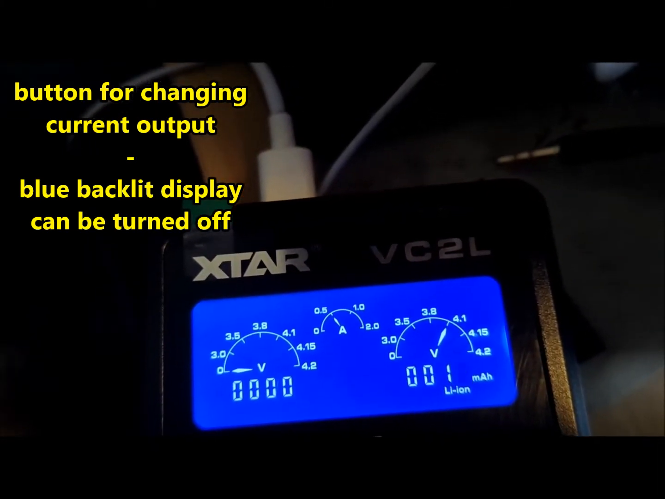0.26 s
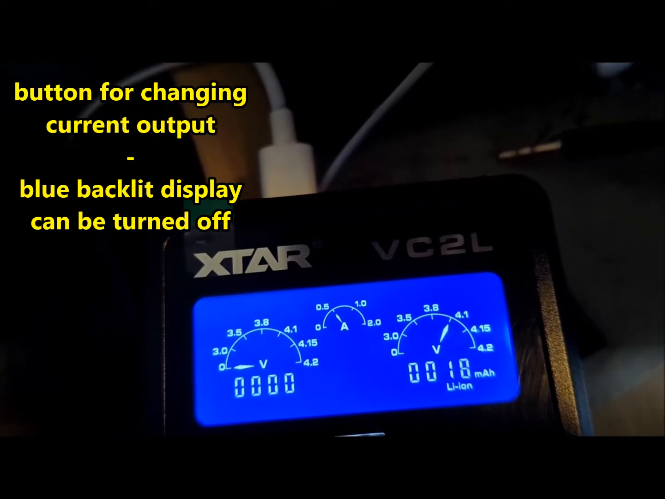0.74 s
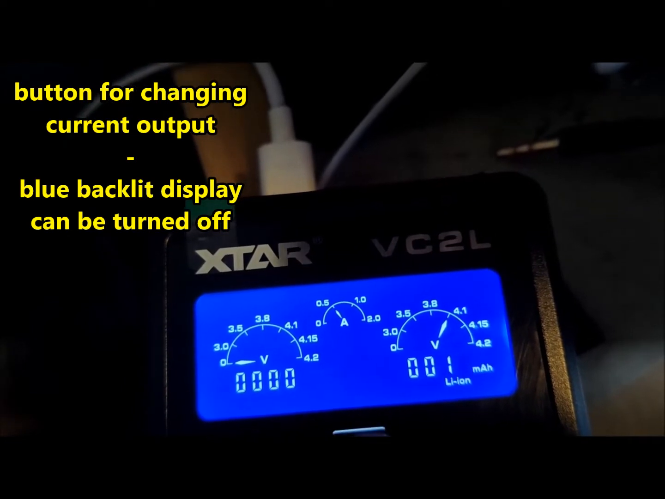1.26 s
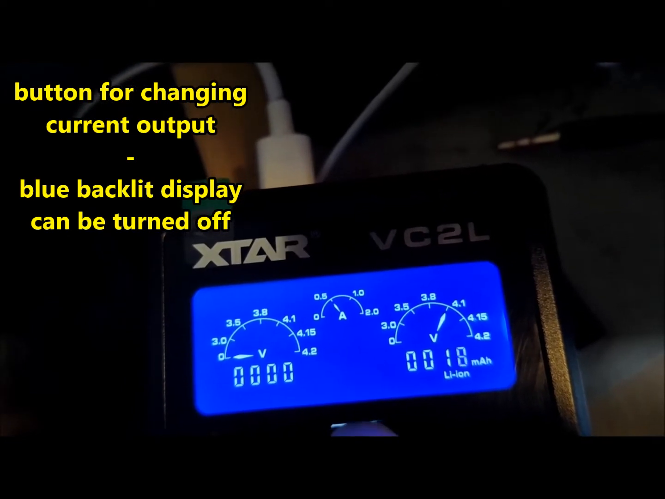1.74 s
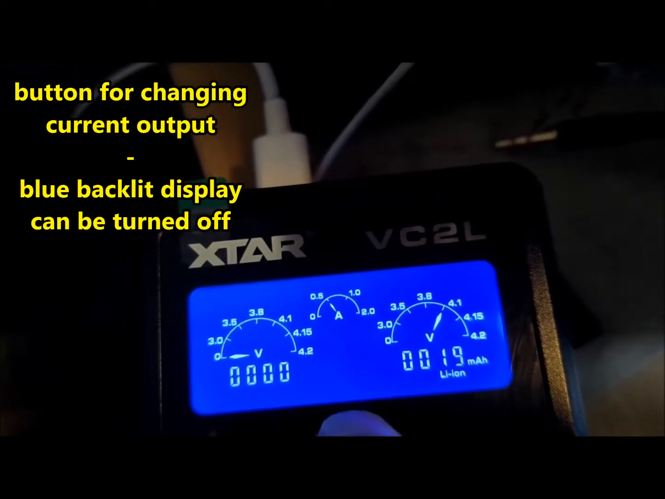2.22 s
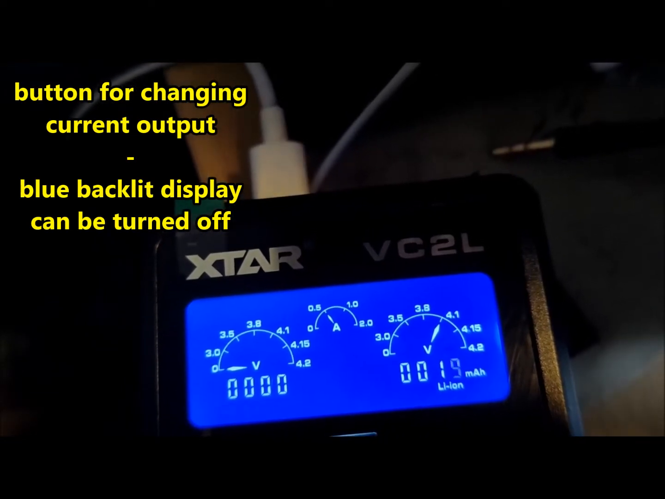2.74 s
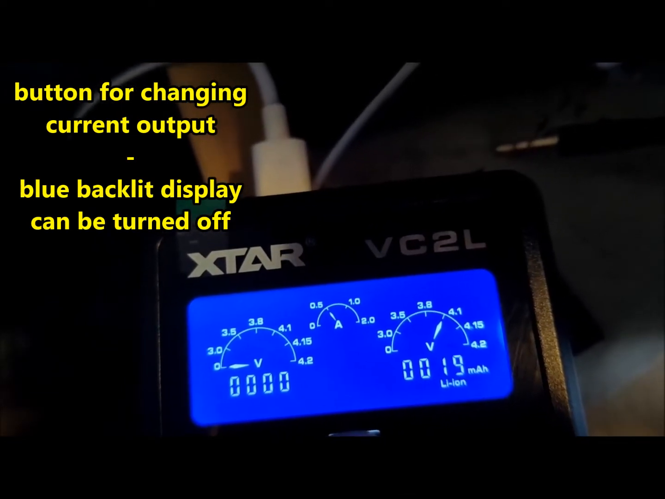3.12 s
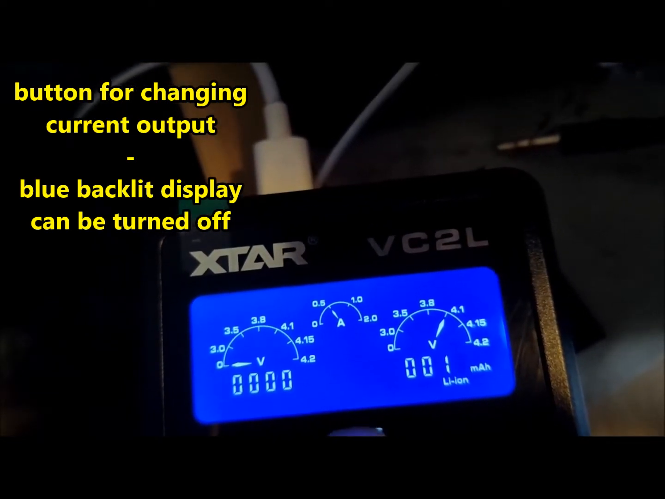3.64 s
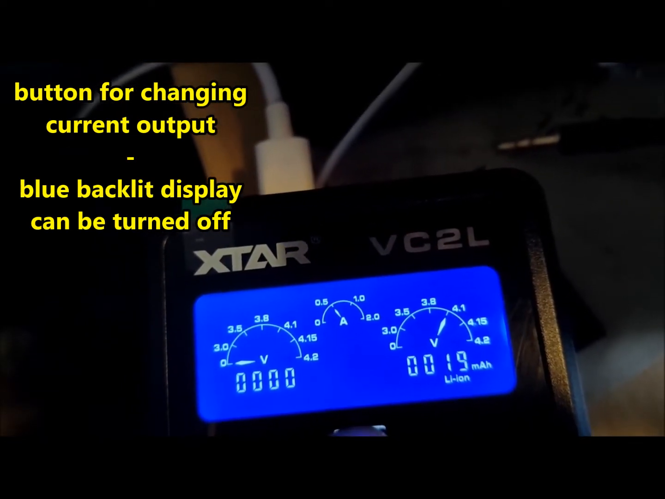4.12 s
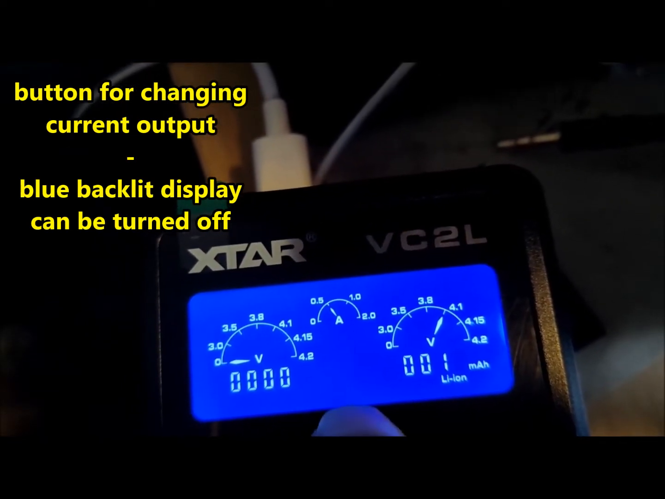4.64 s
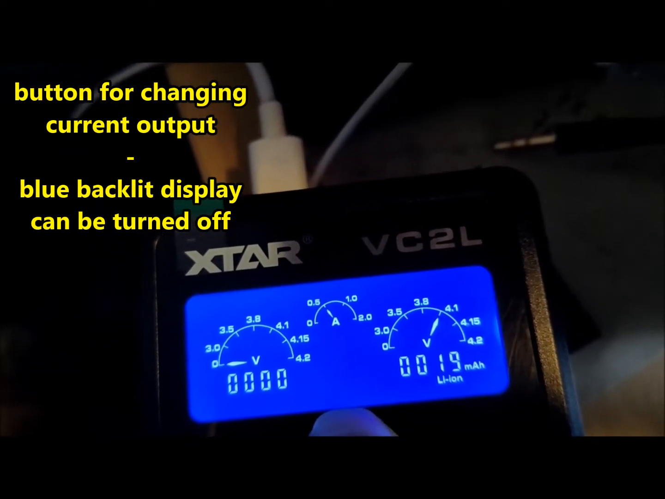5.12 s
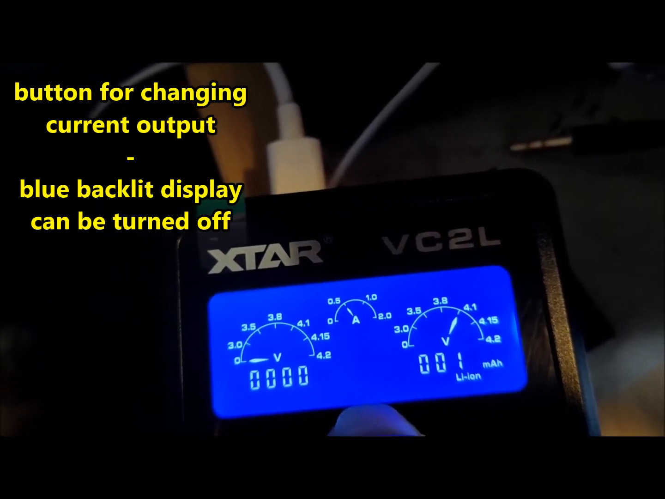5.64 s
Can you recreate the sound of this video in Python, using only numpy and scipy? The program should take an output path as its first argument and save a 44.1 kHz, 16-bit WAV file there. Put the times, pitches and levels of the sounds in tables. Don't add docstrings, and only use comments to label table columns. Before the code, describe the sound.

Close to a hand-held microphone in a quiet indoor room, a small plastic button is clicked several times. Early clicks are moderate; later presses snap much brighter, each followed by a softer, duller release and small thump. Between them the hand shifts with low bumps and gritty ticks, densest in the middle. Faint hum, rumble and hiss lie underneath, and the tone is narrow, lacking the highest treble.

```python
import sys
import numpy as np
from scipy import signal
from scipy.io import wavfile

SR = 44100
rng = np.random.default_rng(int(sys.argv[2]) if len(sys.argv) > 2 else 0)


def gain_from_db(level_db):
    decades = np.asarray(level_db, float) / 20
    return 10 ** decades


def master(y):
    cut = np.clip(np.atleast_2d(y).T, -1, 1)
    pcm = np.round(cut * 32767)
    wavfile.write(sys.argv[1], SR, pcm.astype(np.int16))


N = 258896
LEAD_S = 0.01

# t/s, dome level/dB, lid level/dB, case level/dB, thump level/dB
SNAPS = [(0.2374, -25.5, -26.5, -29.5, -36), (0.253, -32.5, -44, -58, -76), (0.2668, -48, -50, -55, -65),
         (1.4609, -35.5, -37.5, -36, -42.5), (1.8006, -45, -25, -38, -35.5),
         (1.803, -24.5, -52.5, -29, -66), (2.914, -13.5, -17, -30, -37), (3.1973, -24.5, -26, -29, -35.5),
         (3.8023, -37, -50.5, -58, -78), (3.812, -63, -63, -57, -56), (4.1188, -3, -16.5, -33, -39.5),
         (4.4176, -21.5, -20, -25.5, -36.5), (4.9168, -3.5, -17.5, -32, -41),
         (5.2691, -19.5, -18, -26, -35)]
EARLY_SNAP = [
    (-0.0028, -38.5, -43.5, -41.5, -43),
]
# t/s, tilt/(dB/octave)
FINGER_TILT = [(0.24, -20), (1.46, -13), (1.8, -18.5), (2.91, 9.5), (3.2, -5.5), (4.12, 7.5), (4.42, 2),
               (4.92, 17), (5.27, 1)]
# f/Hz, level/dB, T60/s
DOME_MODES = [(5530, -15.5, .016), (5918, -9, 0.016), (6400, -16.5, 0.022), (6310, -4.5, 0.029),
              (6615, -3, 0.025), (6804, 1.7, 0.015), (7030, -10, 0.035), (7500, -20.5, 0.021),
              (7780, -25, 0.025)]
# f/Hz, level/dB, T60/s
LID_MODES = [(2790, -4, 0.01), (3103, -8, 0.015), (3500, -3, 0.017), (4294, -8, 0.023),
             (4800, -11.5, 0.018)]
# f/Hz, level/dB, T60/s
CASE_MODES = [(720, -17, 0.048), (1090, -11.5, 0.034), (1370, -8, 0.038), (1666, 5, 0.03),
              (1910, 2.5, 0.015), (2156, -0.5, 0.024)]
# f/Hz, level/dB, T60/s
THUMP_MODES = [(131, -7.5, 0.13), (200, -11.5, 0.063), (306.9, 3.5, 0.058), (583.2, -18.5, 0.09),
               (614, -20.5, 0.0303)]
# t/s, bump level/dB, bump f/Hz, tick level/dB
CREAKS = [(0.26, -43, 207, -41), (1.05, -53, 271, -63), (1.238, -53.5, 200, -71), (1.444, -48, 201, -76),
          (1.595, -50, 210, -73), (2.026, -49.5, 199, -54), (2.138, -53, 219, -59),
          (2.477, -44.5, 210, -52), (2.508, -52, 197, -48), (2.651, -46, 227.6, -53),
          (2.724, -51.5, 211, -51), (2.754, -50.5, 198, -57.5), (2.829, -51, 212, -60),
          (2.944, -52.5, 212, -41.5), (3.028, -46, 185, -54.5), (3.06, -51, 196, -51),
          (3.154, -46.5, 182, -56), (3.174, -57, 203, -50), (3.227, -48, 224, -49), (3.307, -49, 176, -49),
          (3.402, -45, 176, -45), (3.514, -47, 197, -51), (3.541, -48.5, 257, -50), (3.606, -52, 236, -51),
          (3.814, -62, 233, -46.5), (4.521, -52, 195, -59), (4.649, -50, 248, -53),
          (4.69, -56.5, 279, -55.5), (5.063, -49, 220, -54), (5.299, -55, 206.5, -53)]
# start t/s, step/s, slips, bump level/dB, bump f/Hz
JUDDERS = [
    (2.281, 0.025, 9, -50.5, 175),
    (4.074, .018, 3, -50.5, 225),
    (4.967, .031, 3, -49.5, 243),
]
# f/Hz, level/dB, T60/s
HAND_MODES = [(68.4, 0, 0.034), (130, -0.5, 0.056), (176, -1.6, 0.036), (242, -5.5, 0.084),
              (350, -0.5, 0.016), (654, -17.5, 0.032)]
# t/s, squeeze/(0-1)
SQUEEZE = [(0, 0.15), (1.4, 0.5), (1.95, 0.31), (2.3, 0.92), (2.7, .7), (3.5, 1.0), (3.85, 0.5),
           (4.4, 0.21), (5.87, 0.05)]
# t/s, level/dB
STRAIN = [(0.0, -77), (0.34, -75), (1.31, -76.5), (1.72, -74.5), (2.45, -71.5), (2.83, -72), (3.32, -69.5),
          (3.64, -71.5), (3.79, -71.5), (4.9, -71.5), (5.59, -73), (5.74, -76), (5.87, -77)]
# t/s, level/dB
MOTOR_LOAD = [(0.0, -74.5), (0.52, -77), (1.58, -73.5), (2.88, -75.5), (3.11, -72), (3.61, -70),
              (3.71, -76.5), (4.38, -85.5), (4.56, -77.5), (4.81, -82), (5.05, -85), (5.62, -75),
              (5.74, -79), (5.87, -94.5)]
# start t/s, stop t/s, f/Hz, level/dB
WHINES = [
    (4.97, 5.045, 238, -59.5),
    (3.66, 3.79, 2865, -83),
    (5.70, 5.86, 2433, -83),
]
# delay/ms, level/dB
ECHOES = [(2.0, -14), (3.4, -24.5), (5.2, -23), (9.6, -19.5), (12.8, -26.5), (42, -31.5)]
# f/Hz, level/(dB per Hz)
RUMBLE_SPECTRUM = [(15, -11.5), (45, -11.5), (110, -8), (200, -7), (360, -6), (500, -10.5), (640, -4.5),
                   (900, -35.5), (1500, -51.5)]
# f/Hz, level/(dB per Hz)
HISS_SPECTRUM = [(300, -20.5), (700, -7.5), (1100, 3.8), (1400, 2), (2100, 2.5), (3200, -4.5), (4700, -16),
                 (5700, -6), (6600, -0.5), (7300, -23), (7700, -18), (8400, -30)]


def rms_one(x):
    return x / np.sqrt(np.mean(x ** 2) + 1e-20)


def drift(rate_hz):
    hop = 40
    r = np.exp(-2 * np.pi * rate_hz * hop / SR)
    white = rng.standard_normal(N // hop + 2002)
    slow = signal.lfilter([1], [1, -2 * r, r * r], white)[2000:]
    return np.interp(np.arange(N) / hop, np.arange(len(slow)), rms_one(slow))


def band_pass(x, order, low_hz, high_hz):
    return signal.sosfilt(signal.butter(order, [low_hz, high_hz], "band", fs=SR, output="sos"), x)


def banded_noise(spectrum, patchy_db, per_octave):
    hz_points, db_points = np.transpose(spectrum)
    octaves = np.log2(hz_points[-1] / hz_points[0])
    edges_hz = hz_points[0] * 2 ** np.arange(0, octaves, 1 / per_octave)
    white = rng.standard_normal((2, N))
    out = 0
    for k, (low_hz, high_hz) in enumerate(zip(edges_hz, edges_hz[1:])):
        band = band_pass(white[k % 2], 2, low_hz, high_hz)
        level_db = np.interp(np.log(low_hz * high_hz) / 2, np.log(hz_points), db_points)
        flicker_db = patchy_db * (drift(12) + drift(1.5))
        out = out + band * gain_from_db(level_db + flicker_db)
    return rms_one(out)


def ring(force, hz, t60_s):
    r, w = gain_from_db(-60 / (t60_s * SR)), 2 * np.pi * hz / SR
    return signal.lfilter([0, np.sin(w)], [1, -2 * r * np.cos(w), r * r], force + 1e-18)


def struck(force, modes, peak_db, low_hz, high_hz, opposed=True):
    strengths = gain_from_db(rng.standard_normal(len(modes)))
    if opposed:
        strengths[::2] *= -1
    sound = 0
    for strength, (hz, db, t60_s) in zip(strengths, modes):
        sound = sound + strength * gain_from_db(db) * ring(force, hz, t60_s)
    sound = band_pass(sound, 3, low_hz, high_hz)
    return gain_from_db(peak_db) * sound / np.abs(sound).max()


def tilted(modes, tilt_db):
    middle = np.mean(np.log2([hz for hz, _, _ in modes]))
    return [(hz, db + tilt_db * (np.log2(hz) - middle), t60_s) for hz, db, t60_s in modes]


def add(track, s, sound):
    at = round((s + LEAD_S) * SR)
    track[at:at + len(sound)] += sound[:len(track) - at]


def hiss(strain_db):
    return gain_from_db(strain_db + 1.0) * banded_noise(HISS_SPECTRUM, patchy_db=1.47, per_octave=4)


def rumble(strain_db, squeeze):
    level_db = -73 + 0.17 * (strain_db - strain_db.mean()) + 3 * squeeze
    return gain_from_db(level_db) * banded_noise(RUMBLE_SPECTRUM, patchy_db=1.53, per_octave=3)


def hum(load_db, squeeze):
    motor_hz, whine_ramp_s = 118.1, 0.02
    t = np.arange(N) / SR
    phase = 2 * np.pi * motor_hz * t + 0.46 * drift(1.3)
    lower_db = -77 + 3.5 * np.tanh(drift(4.7))
    middle_db = -88.5 + 19.5 * squeeze + 4.6 * drift(6)
    out = gain_from_db(load_db + 2) * np.sin(2 * phase)
    out += gain_from_db(lower_db) * np.sin(phase)
    out += gain_from_db(middle_db) * np.sin(3 / 2 * phase)
    for start_s, stop_s, hz, db in WHINES:
        ramp = np.clip(np.minimum(t - start_s, stop_s - t) / whine_ramp_s, 0, 1)
        out += gain_from_db(db + 4) * np.sin(2 * np.pi * hz * t) * ramp
    return out


def room(x):
    tail_db, t60_s, onset_s = -49.5, 0.23, 0.0051
    t = np.arange(round(0.4 * SR)) / SR
    answer = gain_from_db(tail_db - 60 * t / t60_s) * rng.standard_normal(len(t)) * np.clip(t / onset_s, 0, 1)
    for ms, db in ECHOES:
        answer[round(ms * SR / 1000)] += gain_from_db(db)
    thin = signal.sosfilt(signal.butter(2, 4300, "high", fs=SR, output="sos"), x) + 0.17 * x
    return signal.fftconvolve(thin, answer)[:len(x)]


def judder_slips():
    rows = []
    for start_s, step_s, number, run_db, hz in JUDDERS:
        for k in range(round(number)):
            late, loud, high, gritty = rng.normal(0, 1, 4)
            bump_db = run_db + 2.5 * loud
            tick_db = bump_db - 3 + 2 * gritty
            rows.append((start_s + step_s * k + 0.0034 * late, bump_db, hz * (1 + 0.11 * high), tick_db))
    return rows


def faint_slips(squeeze):
    rate_per_s, squeeze_rate_db = 3.3, 17.5
    hop = SR // 100
    rows = []
    for k, (chance, late, loud, high, gritty) in enumerate(rng.random((N // hop, 5))):
        if chance < rate_per_s * gain_from_db(squeeze_rate_db * squeeze[k * hop]) * hop / SR:
            bump_db = -58.5 + 8 * (loud - 0.5)
            bump_hz = 200 * gain_from_db(1.9 * (high - 0.5))
            tick_db = bump_db - 0.5 + 14 * (gritty - 0.5)
            rows.append(((k + late) * hop / SR, bump_db, bump_hz, tick_db))
    return rows


def grip(squeeze):
    tick_t60_s = 0.04
    track = np.zeros(N + round(LEAD_S * SR))
    push = np.concatenate([np.hanning(80), np.zeros(3900)])
    t = np.arange(len(push)) / SR
    for s, bump_db, bump_hz, tick_db in list(CREAKS) + judder_slips() + faint_slips(squeeze):
        modes = [(hz, db - 9 * abs(np.log2(hz / bump_hz)), t60_s) for hz, db, t60_s in HAND_MODES]
        bump = struck(push, modes, bump_db - 6.5, low_hz=60, high_hz=891)
        tick = band_pass(rng.standard_normal(len(t)), 2, 450, 2800) * gain_from_db(-60 * t / tick_t60_s)
        add(track, s - 0.002, bump + gain_from_db(tick_db - 2) * tick)
    return track


def button():
    rebound, rebound_span_s = 0.18, 0.0045
    case_lag, thump_lag = 25, 80
    dome_tilt_share, case_tilt_share = 0.3, 0.3
    hash_db, hash_t60_s = -15.5, 0.07
    track = np.zeros(N + round(LEAD_S * SR))
    push = np.concatenate([np.hanning(60), np.zeros(6000)])
    t = np.arange(len(push)) / SR
    for s, dome_db, lid_db, case_db, thump_db in EARLY_SNAP + SNAPS:
        tilt_db = np.interp(s, *np.transpose(FINGER_TILT))
        flip = np.zeros(len(push))
        flip[[0, 20]] = 0.3, -1.0
        late, size = rng.random(8), rng.normal(0, 1, 8)
        contacts = flip.copy()
        np.add.at(contacts, 20 + (late * rebound_span_s * SR).astype(int), rebound * size * gain_from_db(-7 * late))
        dome_modes = tilted(DOME_MODES, dome_tilt_share * tilt_db)
        lid_modes = tilted(LID_MODES, tilt_db)
        case_modes = tilted(CASE_MODES, case_tilt_share * tilt_db)
        case_flip, late_push = np.roll(flip, case_lag), np.roll(push, thump_lag)
        sound = struck(contacts, dome_modes, dome_db, low_hz=4750, high_hz=9660, opposed=False)
        sound += struck(flip, lid_modes, lid_db - 5, low_hz=2450, high_hz=5010)
        sound += struck(case_flip, case_modes, case_db + 1.5, low_hz=693, high_hz=2500)
        sound += struck(late_push, THUMP_MODES, thump_db - 5, low_hz=99.4, high_hz=628.7)
        blur = band_pass(rng.standard_normal(len(t)) * gain_from_db(hash_db - 60 * t / hash_t60_s), 2, 560, 3900)
        add(track, s - 0.0004, sound + (gain_from_db(lid_db) + gain_from_db(case_db)) * blur)
    return track


def scene():
    t = np.arange(N) / SR
    strain_db, load_db, squeeze = [np.interp(t, *np.transpose(c)) for c in (STRAIN, MOTOR_LOAD, SQUEEZE)]
    snaps = button()
    events = (snaps + room(snaps) + grip(squeeze))[-N:]
    low = rumble(strain_db, squeeze) + hum(load_db, squeeze)
    low *= np.clip((t[-1] - t) / 0.16 + 0.43, 0, 1)
    return (events + low + hiss(strain_db))[None]


def low_pass(x):
    return signal.sosfilt(signal.butter(12, 15600, fs=SR, output="sos"), x)


def record(dry):
    cutoff_hz, fizz_top_hz, fizz_db = 7980, 10230, -89.5
    speech_band = signal.firwin(1401, cutoff_hz, window=("kaiser", 7), fs=SR)
    narrow = signal.fftconvolve(dry, speech_band[None], "same")
    fizz_band = signal.butter(6, fizz_top_hz, fs=SR, output="sos")
    fizz = gain_from_db(fizz_db) * signal.sosfilt(fizz_band, rng.standard_normal(dry.shape))
    bent = narrow - 0.034 * narrow ** 5
    return low_pass(bent + fizz)


dry = scene()
out = record(dry)
master(out)
```